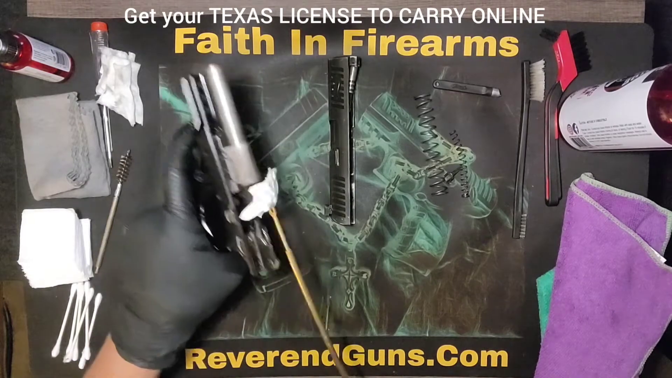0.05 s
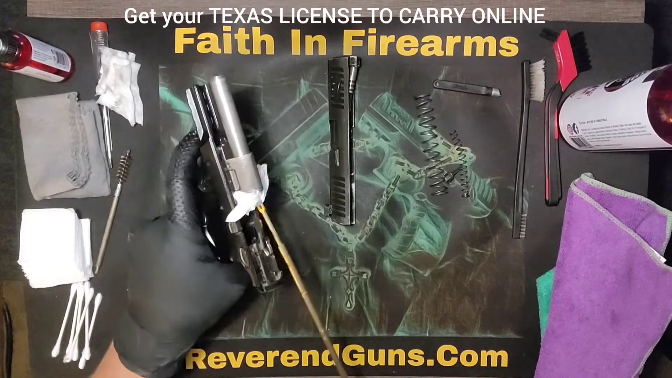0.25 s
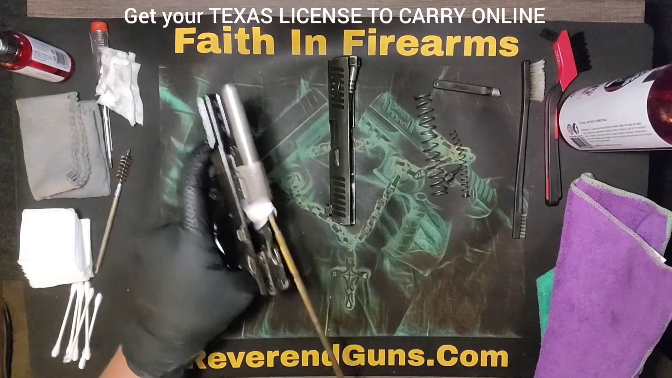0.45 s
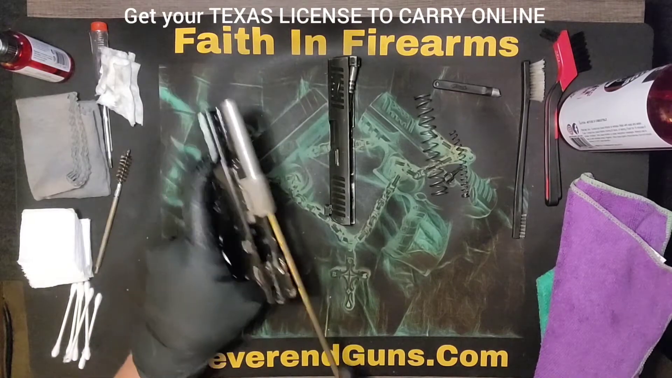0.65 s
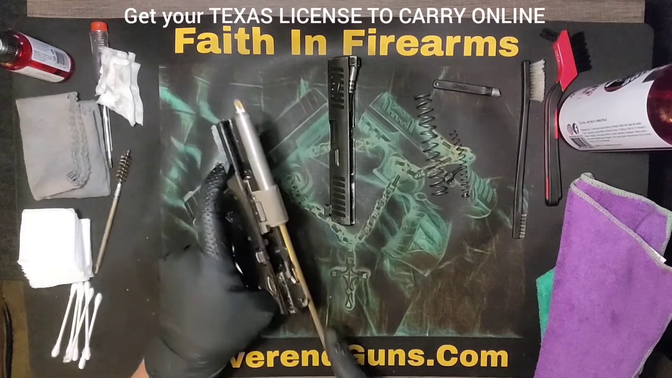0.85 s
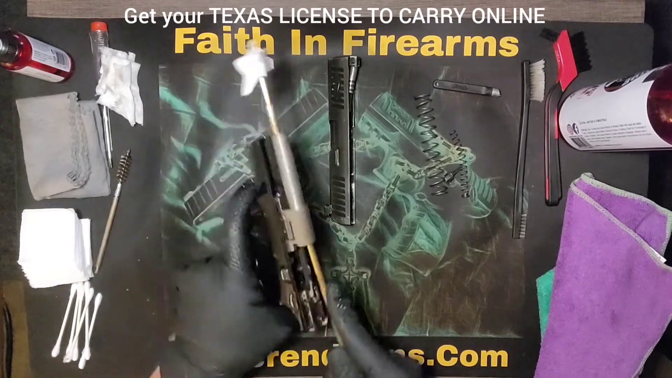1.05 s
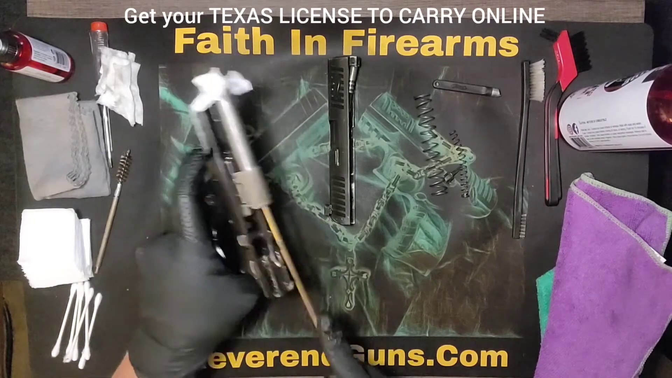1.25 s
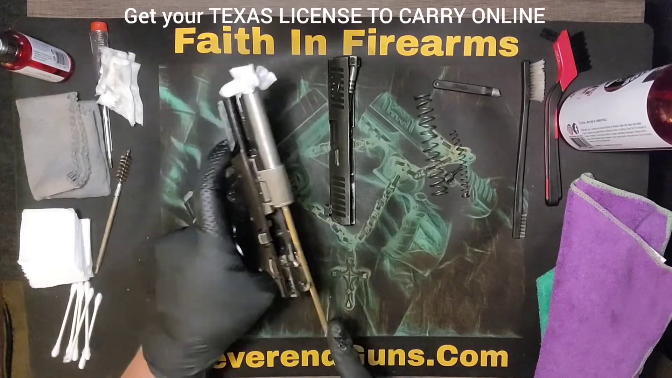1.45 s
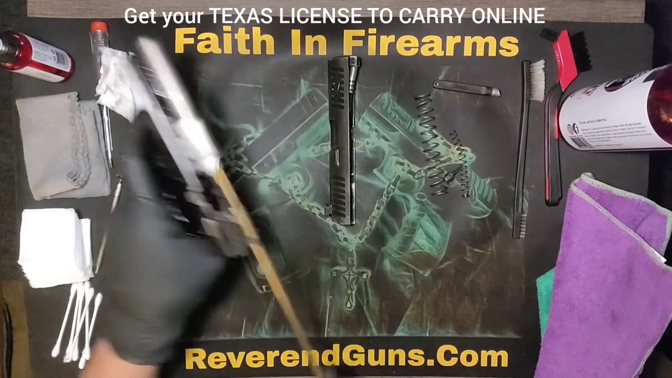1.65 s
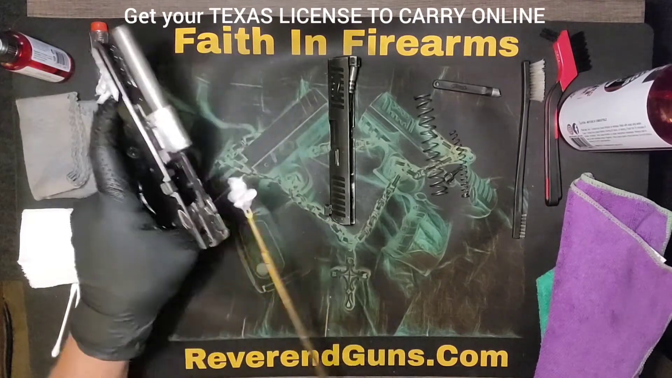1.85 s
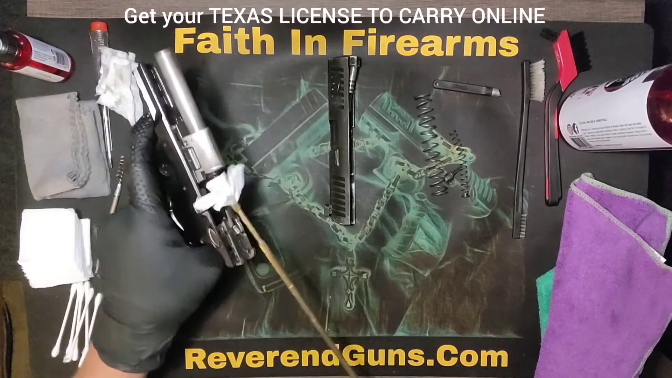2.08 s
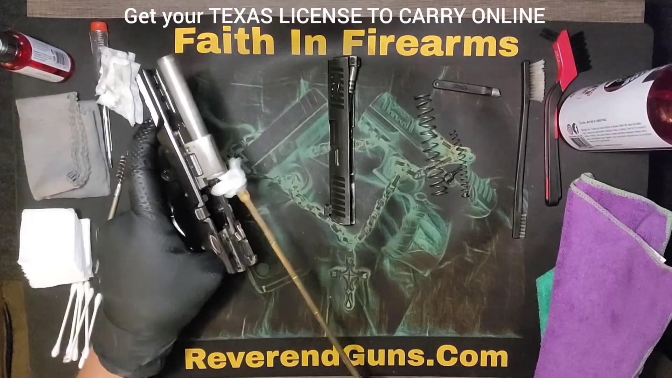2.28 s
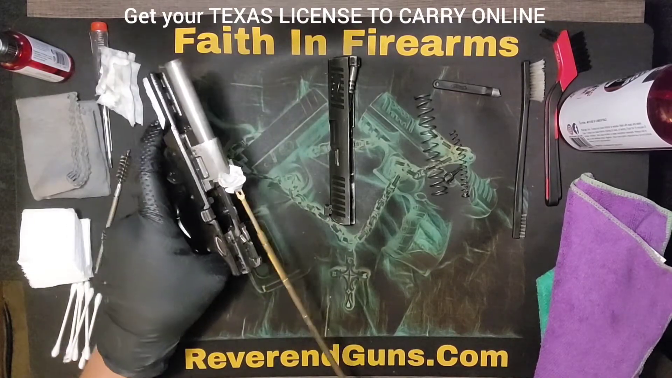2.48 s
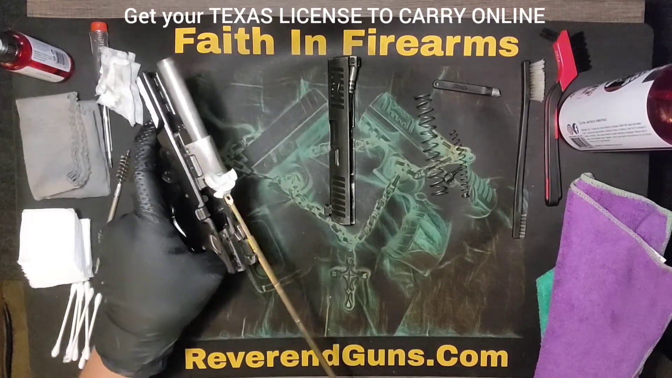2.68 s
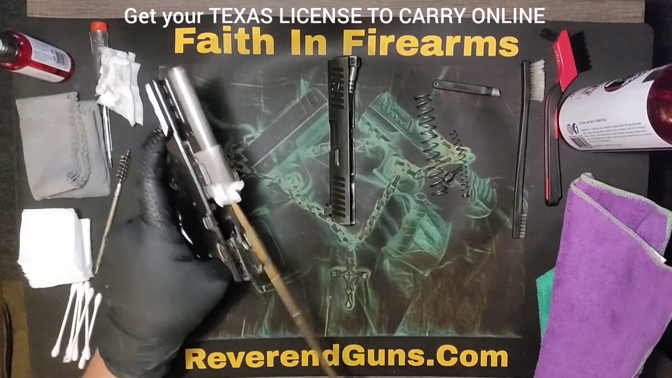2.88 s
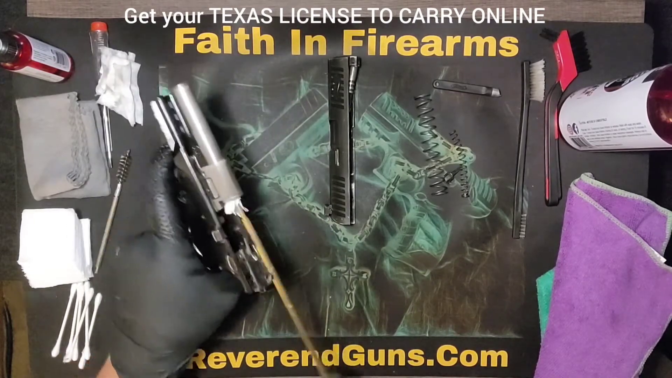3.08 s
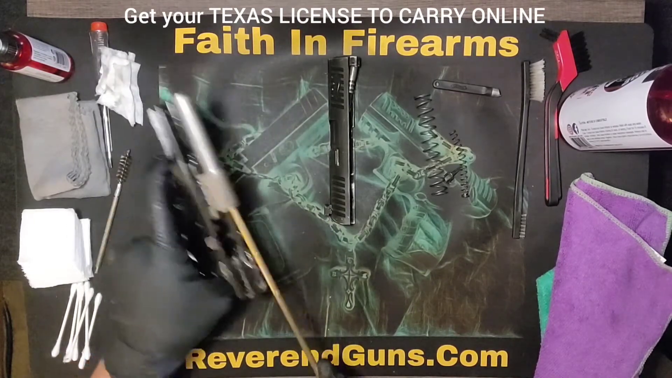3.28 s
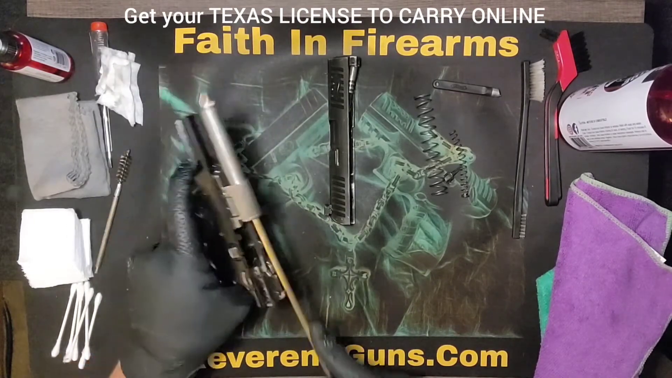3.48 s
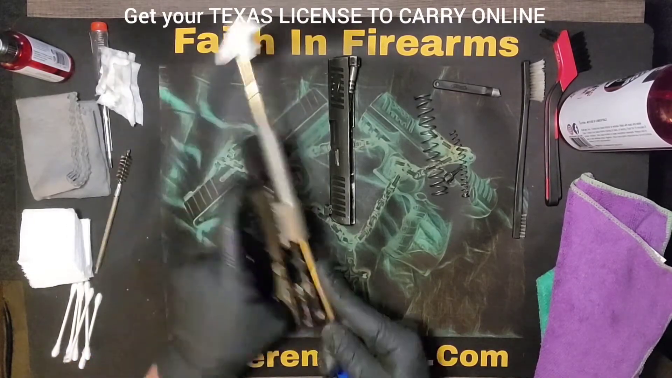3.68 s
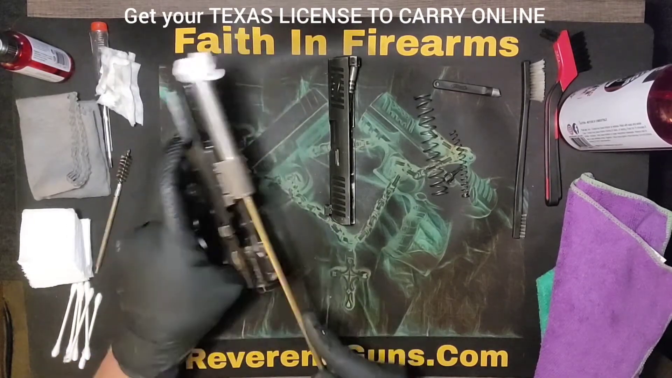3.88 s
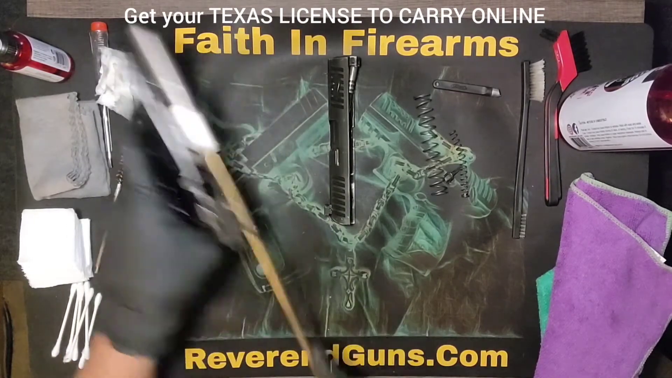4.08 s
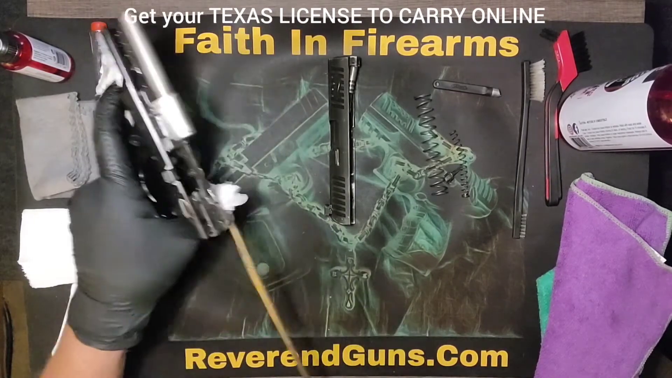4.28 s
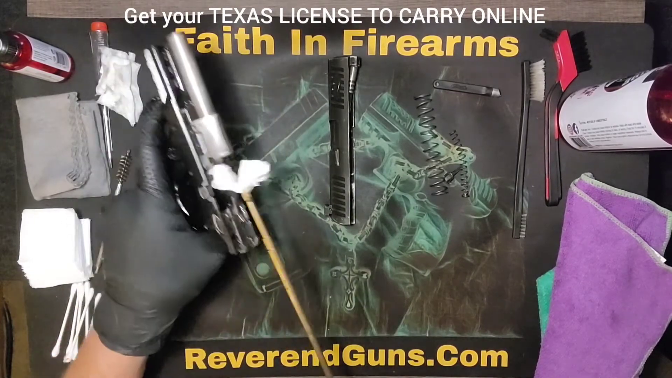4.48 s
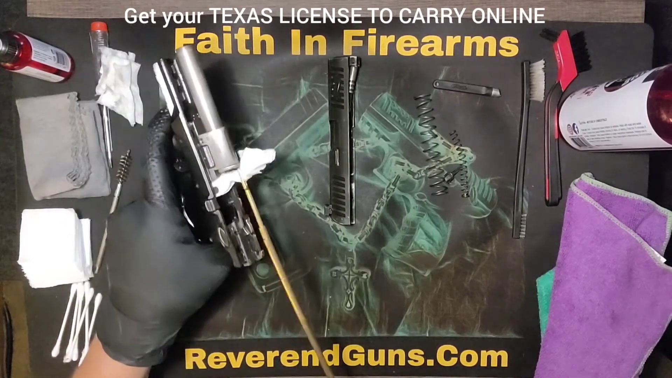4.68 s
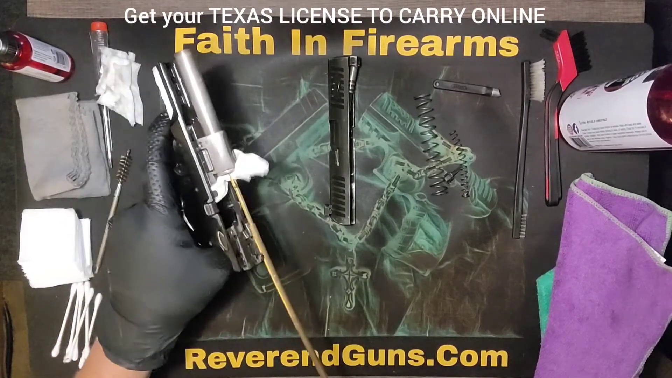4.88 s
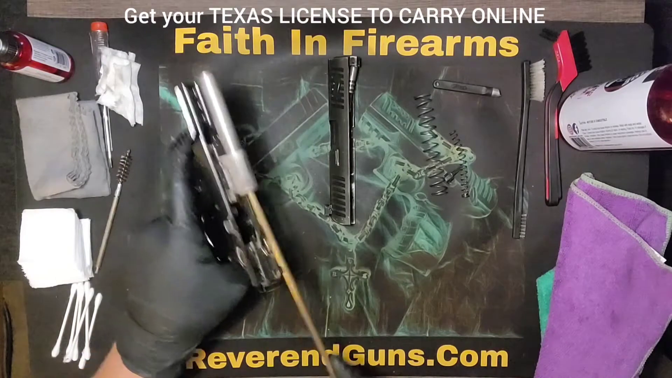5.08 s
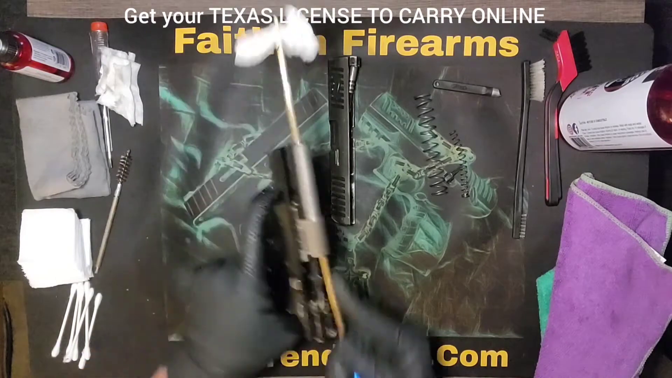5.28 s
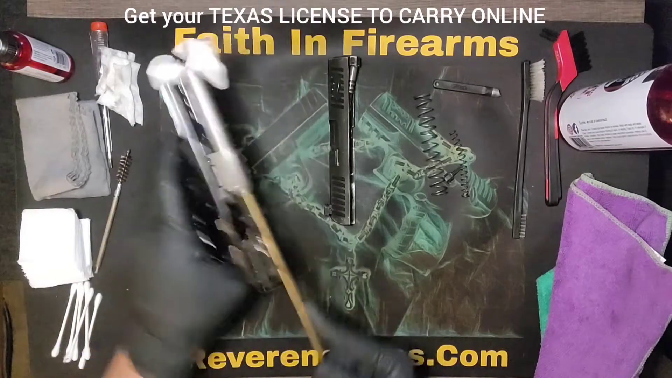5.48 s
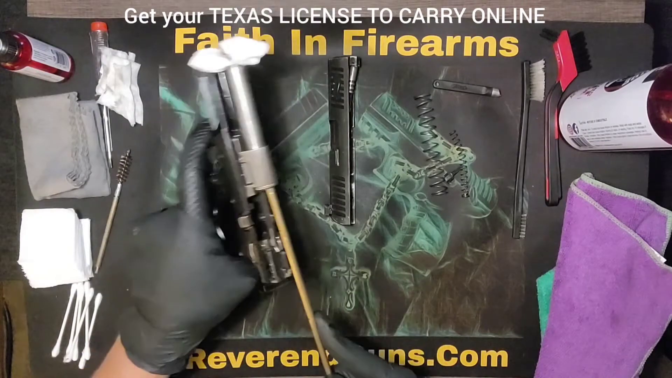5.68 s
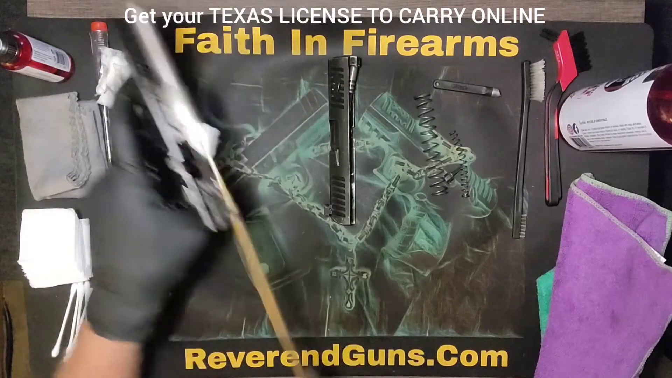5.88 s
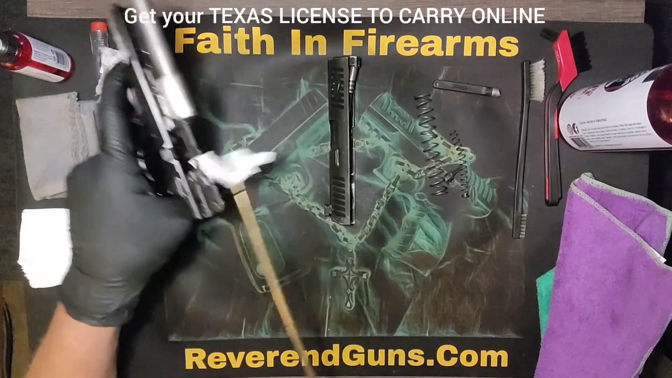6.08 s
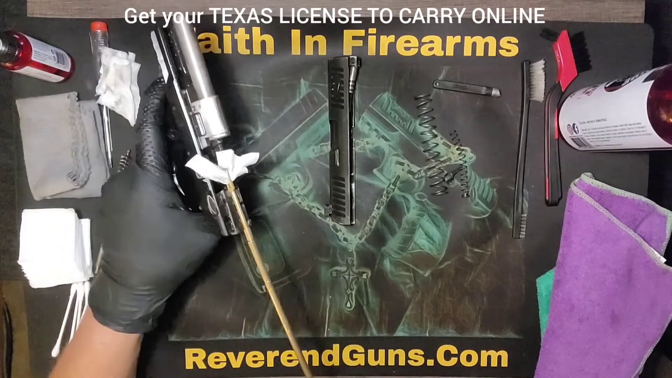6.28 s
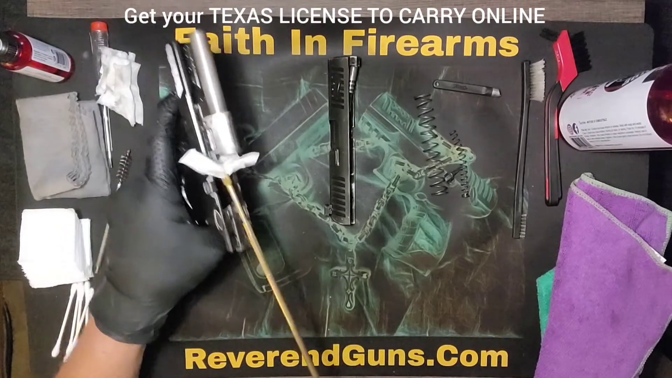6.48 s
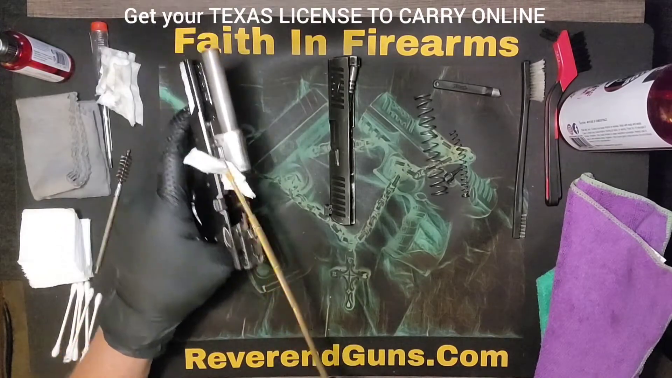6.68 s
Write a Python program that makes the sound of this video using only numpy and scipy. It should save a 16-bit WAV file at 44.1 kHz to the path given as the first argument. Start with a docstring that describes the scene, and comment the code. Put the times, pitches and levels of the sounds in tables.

```python
"""In a small room, a cleaning rod with a cotton patch is pushed through a steel pistol barrel and pulled back, three
times over. Knocks are short bursts of noise, the rasp is made of tiny random clicks; both sound through the barrel.
The cotton's soft swish is filtered clicks, its faint squeaks are unsteady sine tones.
Echoes made of fading noise answer, over an appliance's hum of slow sine waves and the faint rush of the room."""
import sys
import numpy as np
from scipy import signal
from scipy.fft import rfft, irfft, next_fast_len
from scipy.io import wavfile
from scipy.ndimage import uniform_filter1d, map_coordinates

SR = 44100
rng = np.random.default_rng(int(sys.argv[2]) if len(sys.argv) > 2 else 0)


def int16_out(signal):
    """Quantize to a 16-bit WAV file."""
    q = np.round(np.clip(np.atleast_2d(signal).T, -1, 1) * 32767)
    wavfile.write(sys.argv[1], SR, q.astype(np.int16))


N = 297234

# strokes of the rod along the bore; each round is a push, then a pull back, in one to three shoves:
# (fastest moment/s, rise/s, fall/s, base level/dB, middle of the rasp's glide/Hz,
#  hollowness/dB before shared offsets, cotton hiss relative to the base level/dB)
STROKES = [(1.0, 0.058, 0.051, -43.5, 2850, -7.5, -12), (1.137, 0.041, 0.059, -39, 2900, -5.5, -20),
           (1.206, 0.039, 0.062, -43.5, 2760, 3.5, -19.5), (1.597, 0.065, 0.044, -38.5, 3950, -1, -19.5),
           (1.664, 0.12, .08, -41.5, 4070, -4.5, -36), (3.315, 0.028, .07, -48, 4310, 8.5, -13),
           (3.57, 0.069, 0.086, -41.5, 3830, 1, -13.5), (3.78, 0.097, .11, -46, 3420, 6, -19.5),
           (4.07, .05, 0.13, -41, 3920, 1.5, -10), (5.225, 0.072, .12, -41, 3650, -4.5, -14),
           (5.455, 0.086, .09, -40, 2750, -3, -13), (5.8, 0.043, 0.059, -36, 2860, -6, -22.5),
           (5.895, 0.056, 0.069, -46, 3700, 5.5, -11.5)]
TOP_HZ = 15900  # upper limit of the sound
EDGE_DB, ROUNDNESS = 20.5, 1.36  # a movement's level drops this far over its rise or fall; exponent rounds its top


def amp(db):
    """Turn decibels into a gain."""
    return 10 ** (np.asarray(db) / 20)


def unit(x):
    """Scale to an average strength (rms) of 1."""
    return x / np.sqrt(np.mean(x ** 2) + 1e-20)


def along(points, hz):
    """Join (Hz, value) points by straight lines on a log frequency axis."""
    f, v = np.transpose(points)
    return np.interp(np.log(hz + 1), np.log(f + 1), v)


def wobble(rate):
    """Draw a smooth random curve through `rate` random points a second."""
    points = rng.standard_normal(int(N * rate / SR) + 4)
    return map_coordinates(points, [np.arange(N) * rate / SR])


def filtered(x, response):
    """Shape x by a response, a function of frequency in Hz."""
    m = next_fast_len(N + SR // 4)
    hz = np.fft.rfftfreq(m, 1 / SR)
    return irfft(rfft(x, m) * response(hz), m)[..., :N]


def background(waver_db=-0.85):
    """Sine waves of slowly wavering level make the appliance's hum; filtered noise makes the rush of the room."""
    # appliance and mains hum: (f/Hz, peak level before wavering and stereo balance/dB)
    hum_tones = [(19.3, -76), (28.9, -57), (38.5, -71), (54, -71.5), (58.5, -79.5), (77.6, -66),
                 (119.8, -67.5), (175, -81), (236, -88.5), (360, -92)]
    # still air of the room: (f/Hz, level per Hz/dB)
    air = [(10, -102), (22, -94.5), (100, -90), (170, -102), (280, -107), (500, -112), (750, -108.5),
           (1100, -118), (2000, -117), (2850, -113.5), (4200, -120), (6500, -126), (9500, -136),
           (13000, -128)]
    # likeness of the room air at the two microphones: (f/Hz, coherence from 0 to 1)
    alike = [(130, 1), (290, 0.67), (640, 0), (6000, 0.19), (15000, 0.9)]
    t = np.arange(N) / SR
    phases = [2 * np.pi * (hz * t + rng.random()) + 0.11 * wobble(0.44) for hz, db in hum_tones]
    ear_shift = np.array([[.17], [-.17]])  # radians, left and right
    hum = 0
    for (hz, db), phase in zip(hum_tones, phases):
        hum = hum + amp(db + waver_db * wobble(1.7)) * np.sin(phase + ear_shift)

    def shares(hz):
        # the less alike the two sides, the more of the noise goes to their difference
        turn = np.arccos(np.clip(along(alike, hz), -1, 1)) / 2
        return amp(along(air, hz)) * [np.cos(turn), np.sin(turn)]

    white = rng.standard_normal((2, N)) * np.sqrt(SR / 2)
    mid, side = filtered(white, shares)
    return hum * amp([[-.5], [.5]]) + np.array([mid + side, mid - side])


def gesture(peak_s, rise_s, fall_s):
    """Gain of one hand movement: it speeds up, peaks and slows down."""
    t = np.arange(N) / SR - peak_s
    away = np.minimum(np.maximum(-t / rise_s, t / fall_s), 4)
    return amp(-EDGE_DB * away ** ROUNDNESS)


def sliding(glide=3.0, rub_rise=0.47):
    """Gain, rasp centre and hollowness of the rod; where movements overlap, the stronger weighs more in the colour.

    glide: octaves a second that a stroke's resonance climbs as the air column shortens.
    rub_rise: share of a light rub spent speeding up."""
    # light rubs of the rod while it is lined up with the bore:
    # (strongest moment/s, length/s, base level/dB, rasp centre/Hz, hollowness/dB)
    rubs = [(0.228, 0.47, -82.5, 2900, 2.5), (.42, 0.033, -66, 1550, 26), (0.743, 0.33, -67, 2320, -18),
            (2.452, .18, -75, 3730, 6), (2.651, 0.24, -78.5, 3920, -7), (3.227, 0.054, -55, 3420, -9),
            (4.455, .28, -76.5, 3820, 7.5), (4.739, 0.16, -58, 1980, -11), (6.42, 0.18, -66.5, 3060, 1),
            (6.554, 0.32, -71.5, 2660, -11)]
    t = np.arange(N) / SR
    gains, centres, hollows = [], [], []
    for s, rise, fall, db, hz, hollow, cotton in STROKES:
        gains.append(amp(db) * gesture(s, rise, fall))
        centres.append(hz * 2 ** (glide * np.clip(t - s, -rise, fall)))
        hollows.append(hollow)
    for s, length, db, hz, hollow in rubs:
        gains.append(amp(db) * gesture(s, rub_rise * length, (1 - rub_rise) * length))
        centres.append(hz)
        hollows.append(hollow)
    total = sum(gains)
    blend = lambda values: sum(gain * value for gain, value in zip(gains, values)) / total
    return total, blend(centres), blend(hollows)


def barrel(hollow_db, bright_db, stretch=1, ripple_db=0, size=2048, count=70):
    """Response of the barrel to one tap; the place of contact tilts, stretches and ripples its resonances."""
    # resonances of barrel and rod, before stretch and tilt: (f/Hz, width/Hz, level/dB)
    resonances = [(823, 130, -14), (1576, 220, -9), (1946, 160, 2.5), (2856, 240, 5), (3400, 300, 7),
                  (4215, 540, 1.5), (5760, 400, 0), (6820, 830, -1.5), (7810, 150, -2.5), (9180, 400, -14),
                  (12740, 1400, -9), (14730, 1500, -17)]
    # broad colour of a contact between the resonances, before tilt: (f/Hz, level/dB)
    contact_colour = [(60, -53.5), (300, -45), (600, -41), (1150, -29.5), (1650, -13), (3200, -6),
                      (5000, -7.5), (7800, -12), (9800, -23), (11500, -15.5), (16000, -25)]
    hz = np.fft.rfftfreq(size, 1 / SR)
    peaks = 0
    for centre, width, db in resonances:
        away = (hz - centre * stretch) / (width / 2)
        peaks = peaks + amp(db) ** 2 / (1 + away ** 2 / 2) ** 2
    tilt_points = [(300, 0), (800, hollow_db), (2000, hollow_db), (2800, 0), (4300, 0), (9500, bright_db)]
    tilt = along(tilt_points, hz)
    ripple = ripple_db * map_coordinates(rng.standard_normal(count), [np.linspace(0, count - 1, len(hz))])
    power = peaks + amp(along(contact_colour, hz)) ** 2
    gain = np.sqrt(power / (1 + (hz / TOP_HZ) ** 20)) * amp(tilt + ripple)
    # folding the cepstrum makes the response start at once, with nothing before the tap
    cepstrum = irfft(np.log(gain))
    cepstrum[1:size // 2] *= 2
    cepstrum[size // 2 + 1:] = 0
    return irfft(np.exp(rfft(cepstrum)))


def slips(rate, spread_db):
    """Tiny stick-slip clicks, about `rate` a second at random moments and of random size, rms 1."""
    sizes = amp(spread_db * np.clip(rng.standard_normal(N), -2, 2))
    return unit((rng.random(N) < rate / SR) * sizes * rng.choice([-1, 1], N))


def patchy(x, depth_db, width=3, length=5):
    """The colour wanders as the point of contact moves; width in frequency bins, length in time frames."""
    z = signal.stft(x, nperseg=256)[2]
    field = uniform_filter1d(rng.standard_normal(z.shape), round(width), 0)
    field = uniform_filter1d(field, round(length), 1)
    return signal.istft(z * unit(amp(depth_db * unit(field))), nperseg=256)[1][:N]


def rasp(width_hz=240, sing_db=-6, judder_db=3, catch_db=-2, level_db=-2):
    """Slips come in clumps; they sound through the barrel and through a resonance that moves with the rod."""
    effort, centre_hz, hollow = sliding()
    fine = slips(rate=2200, spread_db=4.5) * unit(amp(judder_db * wobble(170)))
    # now and then the rod catches and lets go with a coarser tick, about a millisecond long
    burst = signal.windows.hann(SR // 700) * rng.standard_normal(SR // 700)
    catches = unit(signal.fftconvolve(slips(rate=71, spread_db=1.0), burst)[:N])
    friction = unit(fine + amp(catch_db) * catches) * effort * amp(level_db)
    body = barrel(hollow_db=-1.0, bright_db=-3.5)
    through_barrel = signal.fftconvolve(friction, body / np.linalg.norm(body))[:N]
    grit = patchy(through_barrel, depth_db=6.5)
    # the more open the bore, the stronger its lowest air resonances
    lows = filtered(grit, lambda hz: 1 / (1 + (hz / 2300) ** 10))
    grit = grit + (amp(hollow) - 1) * lows
    # a narrow resonance whose centre glides as the rod changes the length of the air column:
    # shift the centre down to 0 Hz, smooth, then shift back up
    turn = np.exp(2j * np.pi * np.cumsum(centre_hz) / SR)
    t = np.arange(SR // 50) / SR
    fade = t * np.exp(-2 * np.pi * width_hz * t)
    smoothed = signal.fftconvolve(friction / turn, fade / np.linalg.norm(fade))[:N]
    sing = np.sqrt(2) * (smoothed * turn).real
    return grit + amp(sing_db) * sing


def swish(level_db=0, flutter_db=3.0):
    """Countless cotton fibres brush the steel, as the patch is fed in and with every stroke: a fine, bright hiss."""
    # the patch is eased into the mouth of the chamber:
    # (firmest moment/s, rise/s, fall/s, level before flutter/dB)
    feeds = [(.43, 0.058, 0.068, -69), (0.504, 0.1, .045, -66.5), (.66, 0.098, 0.15, -64),
             (2.899, 0.022, 0.029, -67), (3.033, 0.051, 0.051, -61.5), (3.24, 0.05, 0.14, -70),
             (4.995, 0.073, 0.057, -57), (5.08, 0.098, .1, -70)]
    # colour of the cotton's hiss: (f/Hz, relative level/dB)
    cotton_colour = [(300, -16), (1500, -12), (2000, -4), (4800, -7), (5400, 1), (7800, -1), (8400, -7),
                     (10600, -11), (12000, -2), (14000, 0), (15700, -3), (17000, -30)]
    fed = sum(amp(db) * gesture(s, rise, fall) for s, rise, fall, db in feeds)
    dragged = sum(amp(db + cotton) * gesture(s, rise, fall) for s, rise, fall, db, hz, hollow, cotton in STROKES)
    brushes = slips(rate=21000, spread_db=0.0)
    fibres = unit(filtered(brushes, lambda hz: amp(along(cotton_colour, hz))))
    hiss = patchy(fibres, depth_db=2.5, length=14)
    return hiss * (fed + dragged) * amp(level_db + flutter_db * wobble(83))


def squeaks(waver=0.046):
    """Cotton sticks and slips on the steel: a faint sine tone of unsteady pitch for a moment."""
    # (middle/s, rms level at the middle/dB, pitch before wavering/Hz, length/s)
    squeak_list = [(0.409, -66.5, 1520, 0.019), (0.781, -65, 2000, 0.019), (2.892, -67, 1482, 0.02)]
    t = np.arange(N) / SR
    glide = np.cumsum(1 + waver * wobble(250)) / SR
    out = np.zeros(N)
    for s, db, hz, length in squeak_list:
        swell = np.exp(-(2 * (t - s) / length) ** 2)
        out += amp(db) * swell * np.sqrt(2) * np.sin(2 * np.pi * hz * glide)
    return out


def rattles(count=2, rattle_db=-1, spread_db=7):
    """The loose rod ticks at random moments of each stroke, on average hardest where it moves fastest."""
    rows = []
    for s, rise, fall, db, hz, hollow, cotton in STROKES:
        for place, force in rng.uniform(-1, 1, (count, 2)):
            slowing_db = EDGE_DB * abs(place) ** ROUNDNESS / 2
            level = db + rattle_db + spread_db * force - slowing_db
            moment = s + place * (rise if place < 0 else fall)
            rows.append((moment, level, hollow, 0))
    return rows


def knocks(swell=0.00077, ring_db=-17, level_db=-2.06, hollow_db=-2.5, bright_db=-5.5, detune=0.019,
           ripple_db=3.0, early_tick_s=.006, early_tick_db=-24.5):
    """Each knock is a few milliseconds of chatter that sounds through the barrel and leaves it ringing."""
    # the rod knocks against the barrel; level_db, hollow_db and bright_db are added to these:
    # (t/s, level/dB, hollowness/dB, brightness/dB)
    knock_list = [(.4206, -46.5, 2, 6), (.674, -32.5, 7.5, 11.5), (.868, -53, -1, -22),
                  (0.9887, -30, 11.5, 4.5), (1.0775, -44, -3, -16), (1.1868, -41, -3, 19),
                  (1.201, -29, -1, -11), (1.2138, -34.5, 4, 7), (1.4632, -38, -8.5, 3.5),
                  (1.5071, -50, -2.5, -16), (1.5648, -37.5, -22.5, -6.5), (1.59, -29, -7, 7),
                  (1.6372, -26.5, 3, 0.5), (1.645, -31.5, 10, -1), (1.7236, -52, 1, -0.5),
                  (3.113, -61.5, -3, -1), (3.2975, -32, 2, -19), (3.326, -33.5, 2, -7.5),
                  (3.537, -39, -2, 9), (3.5621, -24.5, -10, 7.5), (3.7486, -36.5, 4.5, -1),
                  (3.762, -33.5, -5.5, -4), (3.8054, -40.5, 8, -3.5), (3.8707, -47.5, -4, -12.5),
                  (4.031, -36.5, -0.5, 1.5), (4.0505, -18, 7, 12), (4.0908, -27.5, -9.5, -1.5),
                  (4.098, -29.5, 6.5, -13), (4.1774, -34.5, 8.5, -3.5), (4.6903, -37.5, 0, 1),
                  (4.7477, -53.5, 12, 6), (5.149, -42.5, -1.5, -4), (5.1829, -34, -1, -7),
                  (5.192, -39, -1, -2), (5.2315, -29, 5, 15), (5.2345, -26.5, 4.5, -10),
                  (5.303, -37, -3.5, -11), (5.3646, -32.5, 5, -12.5), (5.4436, -35, -15, 10),
                  (5.4793, -32, 10.5, 3.5), (5.4995, -43, 14, -5), (5.649, -50.5, 1, -11.5),
                  (5.722, -50, -1.5, -11), (5.7783, -21.5, 7, 6.5), (5.799, -27.5, -4.5, 3),
                  (5.8775, -32.5, -0.5, -18), (5.9355, -38, 6, 1.5), (6.176, -58.5, -19, -26),
                  (6.2568, -55, 6, 14), (6.3764, -51, -6, 3), (6.4858, -48.5, 6.5, 16),
                  (6.603, -59, 6, -16)]
    # lingering tones of the bore and the steel, before random scatter:
    # (f/Hz, relative level/dB, time to fade by 60 dB/s)
    ring_tones = [(1676, -9, 0.16), (2010, -4, .1), (1946, -3.5, 0.05), (2640, -5.5, 0.035),
                  (3720, 19.5, 0.23), (4000, -3, 0.047), (4236, -4, 0.055), (5700, -11, .08),
                  (6530, -1.5, 0.12), (7820, 2.5, 0.069)]
    out, t = np.zeros(N + SR), np.arange(SR // 5) / SR
    contact = SR / 200  # samples; levels count as the rms over these 5 ms
    for s, db, hollow, bright in list(knock_list) + rattles():
        chatter = rng.standard_normal(len(t)) * t * np.exp(-t / swell)
        # the rod's depth in the bore detunes the resonances a little from knock to knock
        body = barrel(hollow + hollow_db, bright + bright_db, 1 + detune * rng.standard_normal(), ripple_db)
        clack = signal.fftconvolve(chatter, body)[:len(t)]
        chance = rng.standard_normal((len(ring_tones), 2))
        ring = np.zeros(len(t))
        for (hz, level, t60), (a, b) in zip(ring_tones, chance):
            fading = amp(level + 3.5 * a - 60 * t / t60)
            ring += fading * np.sin(2 * np.pi * hz * (1 + detune * b / 2) * t)
        blow = unit(clack) + amp(ring_db) * unit(ring * (1 - np.exp(-t / swell)))
        force = amp(db + level_db) * np.sqrt(contact / len(t))
        out[round(s * SR):][:len(t)] += force * blow
        # a much fainter tick comes a few milliseconds before each knock
        out[round((s - early_tick_s) * SR):][:len(t)] += force * amp(early_tick_db) * unit(clack)
    return out[:N]


def room(x, early_db=-5.0, early_t60=0.063, tail_db=-10, gap=.002, count=5):
    """Bench and walls answer with fading noise; the echo pattern shifts as the hands move the barrel about."""
    # how long echoes last: (f/Hz, time to fade by 60 dB/s)
    fade_times = [(300, 0.18), (2000, 0.22), (4000, 0.22), (8000, 0.087), (16000, 0.1)]
    out = np.zeros((2, N))
    place = np.arange(N) / SR * 4  # four echo patterns a second, blended and taken in turn
    for k in range(count):
        hz, s, z = signal.stft(rng.standard_normal((2, SR // 2)), SR, nperseg=256)
        fading = amp(-60 * s / along(fade_times, hz)[:, None])
        tail = signal.istft(z * fading, SR, nperseg=256)[1]
        t = np.arange(tail.shape[1]) / SR
        early = rng.standard_normal(tail.shape) * amp(-60 * t / early_t60)
        answer = (amp(tail_db) * unit(tail) + amp(early_db) * unit(early)) / np.sqrt(len(t))
        share = np.sqrt(np.clip(1 - np.abs((place - k + 1) % count - 1), 0, 1))
        delayed = np.pad(x * share, (round(gap * SR), 0))
        out += signal.oaconvolve(delayed[None], answer, axes=1)[:, :N]
    return out


def scene(left_db=0.67, direct_db=0):
    """The barrel is held a little left of the microphones: the left is louder and leads in phase."""
    # lead of the left microphone over the right in the direct sound: (f/Hz, phase/rad)
    lead = [(20, 0.61), (700, 1.96), (1500, 1.5), (2600, 1), (3800, 4.88), (6000, 8.15), (9000, 6.55),
            (16000, 7)]
    work = knocks() + rasp() + swish() + squeaks()
    direct = filtered(work, lambda hz: np.exp(.5j * along(lead, hz) * np.array([[1], [-1]])))
    balance = amp([[left_db], [-left_db]])
    return (amp(direct_db) * direct + room(work)) * balance + background()


def record(dry):
    """A very steep filter cuts the treble above the upper limit."""
    return filtered(dry, lambda hz: 1 / np.sqrt(1 + (hz / TOP_HZ) ** 160))


dry = scene()
out = record(dry)
int16_out(out)
```